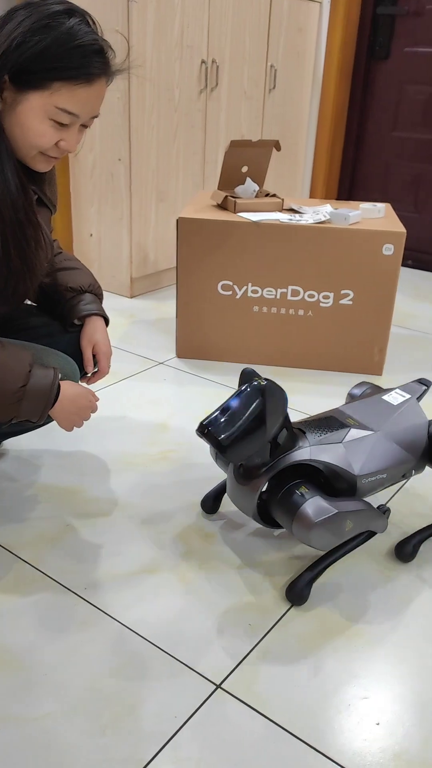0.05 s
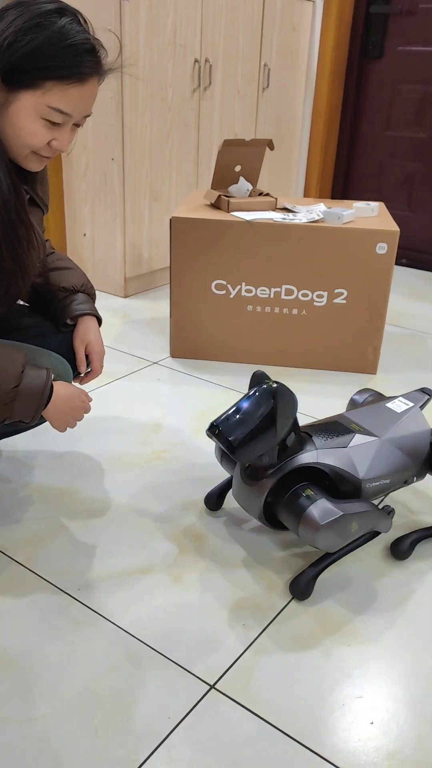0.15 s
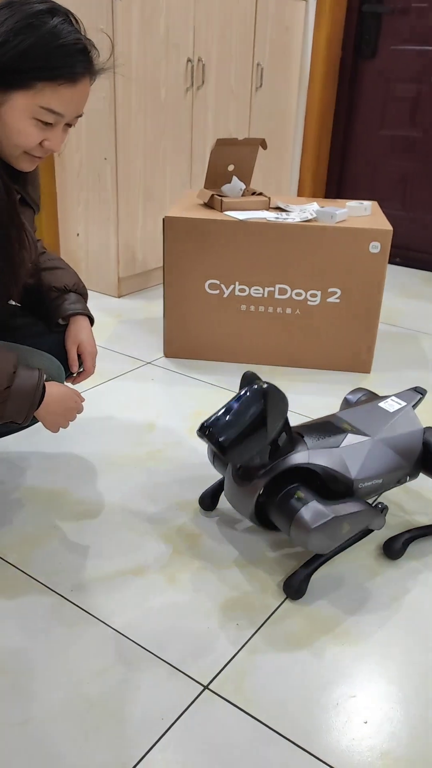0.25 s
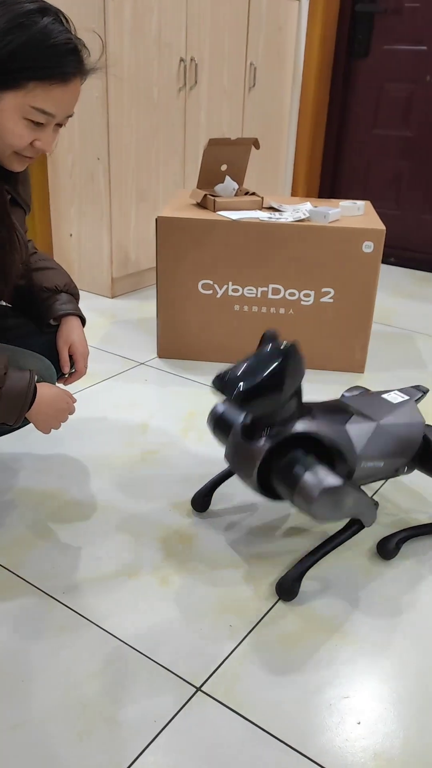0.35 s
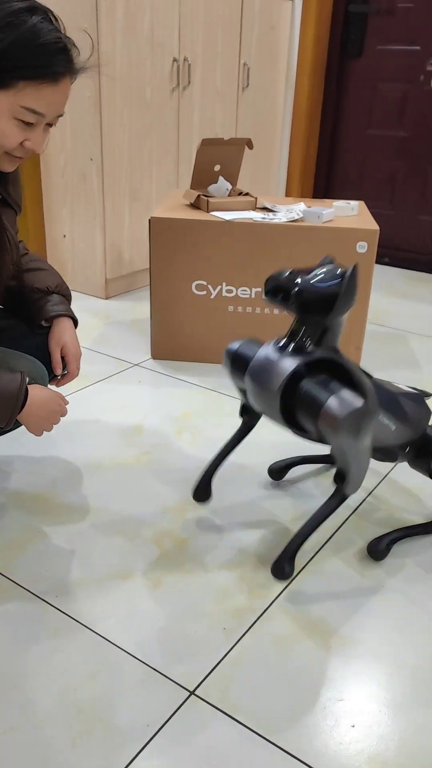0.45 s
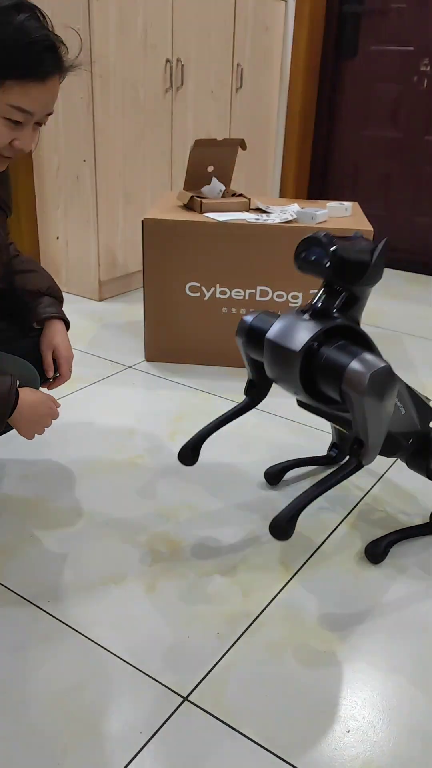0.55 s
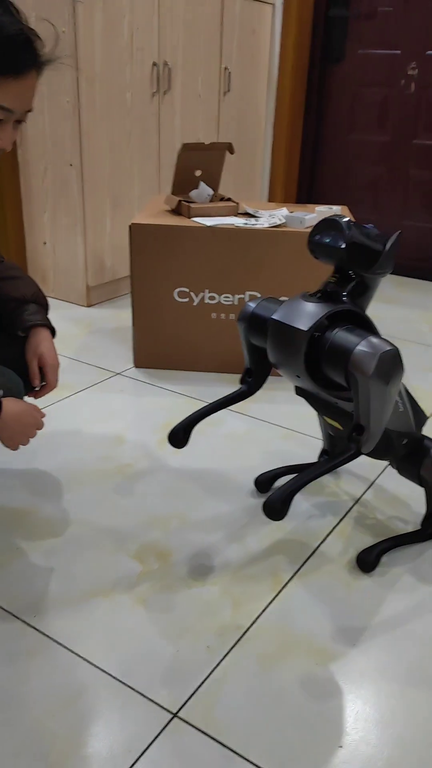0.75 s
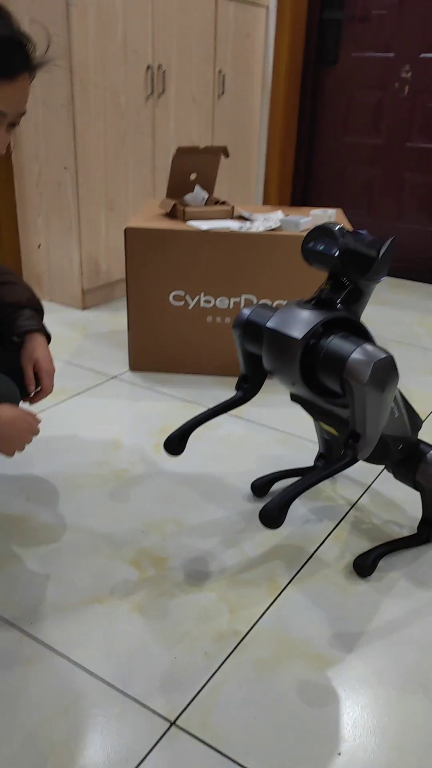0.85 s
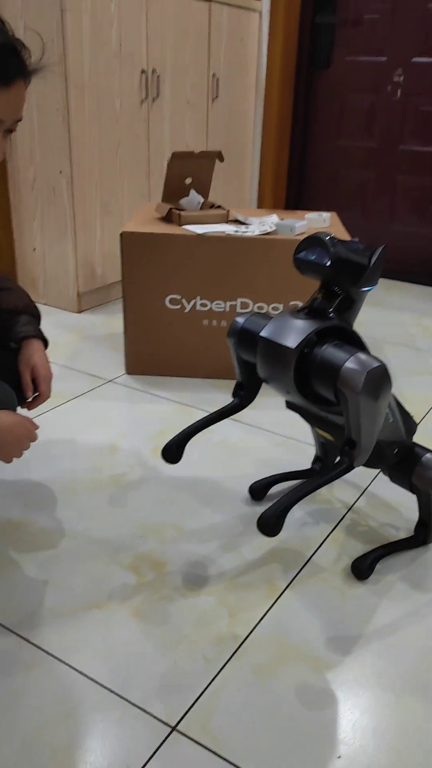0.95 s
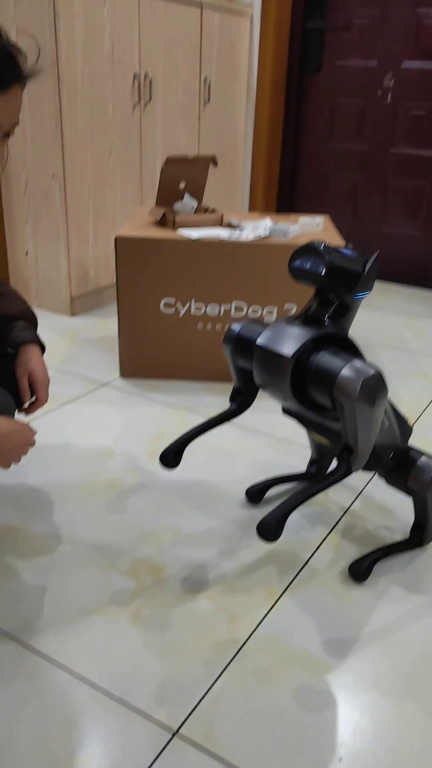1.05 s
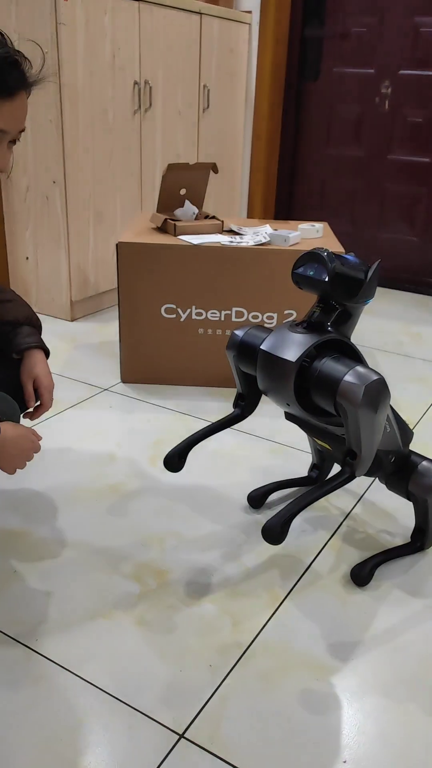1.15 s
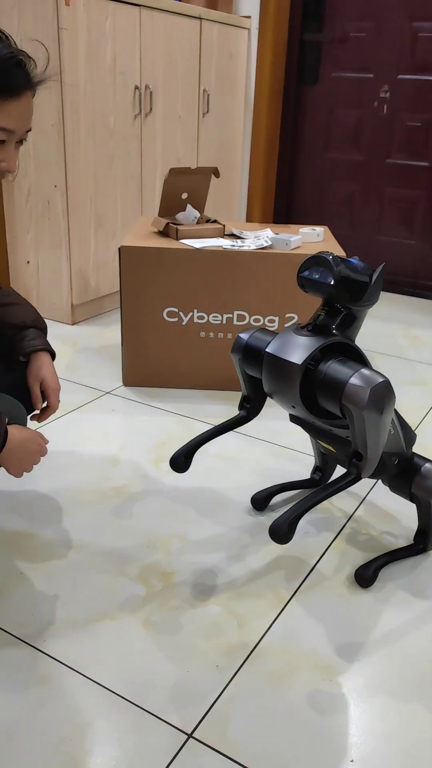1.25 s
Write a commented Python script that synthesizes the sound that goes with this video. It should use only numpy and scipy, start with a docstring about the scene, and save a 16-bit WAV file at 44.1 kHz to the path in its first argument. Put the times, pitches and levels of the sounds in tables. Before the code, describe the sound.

A four-legged robot springs up on tile. Faint fan rush and hum run throughout. At about 0.24 seconds joints and feet hit in a loud, dense burst of clacks and thuds until 0.3, with a short scuff and low boom. The hard room rings. Motors whirr upward from 0.4 to 0.57, stopping with a duller knock. Very faint foot taps come near 1.0, then a thin high whine.

```python
"""A four-legged robot springs up onto its hind legs on a tiled floor, a metre or two from the microphone.
Its joints snap taut and its feet thump (swelling sines and scattered clicks that ring the frame) and
scuff (noise grains). The motors whirr up to speed (sidebands, gear tones, rasp) and stop with a knock,
and a foot taps later. A thin switching tone comes and goes, cooling fans run on (coloured noise and
hum lines), and the small hard room rings (a tail of decaying noise bands) and booms (a low sine)."""
import sys
import numpy as np
from scipy import signal
from scipy.fft import rfft, irfft
from scipy.io import wavfile
from scipy.ndimage import uniform_filter1d

SR = 44100
rng = np.random.default_rng(int(sys.argv[2]) if len(sys.argv) > 2 else 0)


def transcribe(signal):
    """Save signal, clipped to [-1, 1], as a 16-bit WAV file at the path in sys.argv[1]."""
    frames = np.atleast_2d(signal).T
    limited = np.clip(frames, -1, 1)
    pcm = np.round(limited * 32767).astype(np.int16)
    wavfile.write(sys.argv[1], SR, pcm)


N = 57330  # samples, 1.3 s
DRIVE_HZ = 11950  # switching tone of the motor drives


def undb(db):
    """Decibels to gain."""
    return 10 ** (np.asarray(db) / 20)


def unit(x):
    """Scale to rms 1."""
    return x / np.sqrt(np.mean(x ** 2) + 1e-20)


def on_log(hz, points):
    """Read (Hz, value) points on a log-frequency axis."""
    p = np.array(points, float)
    return np.interp(np.log(np.maximum(hz, 1)), np.log(p[:, 0]), p[:, 1])


def colour(x, points, tilt_db=0, size=2048):
    """Minimum-phase filter of unit power with the given spectrum, tilted in dB per octave about 2 kHz."""
    hz = np.arange(size // 2 + 1) * SR / size
    tilt = tilt_db * np.log2(np.maximum(hz, 200) / 2000)
    gain = unit(undb(on_log(hz, points) + tilt))
    # folding the cepstrum onto positive times makes the filter causal
    cepstrum = irfft(np.log(gain))
    cepstrum[1:size // 2] *= 2
    cepstrum[size // 2 + 1:] = 0
    impulse = irfft(np.exp(rfft(cepstrum)))
    return signal.fftconvolve(x, impulse)[:len(x)]


def walk(rate):
    """Smooth random drift of rms 1, with a fresh random value `rate` times a second."""
    k = int(SR / rate)
    steps = np.repeat(rng.standard_normal(N // k + 1), k)
    smooth = uniform_filter1d(uniform_filter1d(steps, k), k)
    return unit(smooth[:N])


def since(start):
    """Seconds since a moment, 0 before it."""
    return np.maximum(np.arange(N) / SR - start, 0)


def legs():
    """Each blow is a dull thud and a hard clack; both ring the frame and shell as decaying modes."""
    # blows of legs and feet, and at 0.471 s a short creak of the gears: (time [s], thud level [dB], thud pitch
    # [Hz], # thud swell [cycles], clack level [dB], clack tilt [dB per octave], clack scatter [s])
    blows = [(0.2307, -45, 390, 0.76, -27, 0.5, 0.0057), (0.2415, -22.5, 770, 1.45, -1, 0.5, .0012),
             (0.2432, -40, 434, 0.9, 7.5, 0.7, .0018), (0.2600, -5, 403, 0.66, -5.5, 8, 0.0035),
             (0.2775, -16.5, 241, 1.17, -16.5, 4.5, .003), (0.2922, -19, 236, 0.31, -2.5, 1.5, .003),
             (0.3026, -11.5, 283, 0.58, -12, -0.5, 0.0035), (0.471, -48, 310, 0.67, -15.5, 0.5, .005),
             (0.548, -32, 294.2, 3.5, -24, -7.5, .003), (0.565, -27, 1550, 2.9, -11.5, 1, .003),
             (0.5690, -23.5, 706, 1.14, -8, -5.5, 0.0043), (0.573, -19.5, 350.6, 1.63, -9.5, -6.5, 0.0027),
             (0.5860, -26, 343, 1.3, -15.5, -3, .003), (0.59, -25, 223, 0.71, -12.5, -5, .003),
             (0.9756, -32, 1600, 0.47, -34, -2, 0.00049), (0.9778, -40.5, 332, 1.25, -47, -3, 0.0039),
             (0.9945, -34.5, 251, 0.54, -52, 4, 0.0033), (1.041, -41, 338, 1.2, -37.5, -3, 0.0053),
             (1.062, -39, 267, 0.4, -45, 3, 0.0035)]
    # modes of frame, shell and the space around them: (frequency [Hz], level [dB], t60 [s])
    body = [(148.1, -1, 0.17), (200, -2.5, 0.12), (238, -8, 0.22), (296.4, -3, 0.19), (358, -5, 0.15),
            (398.7, -6, 0.056), (470, -3.5, 0.19), (620, -18, 0.064), (752, -5, 0.047), (830, -7, 0.04),
            (1605, -1, 0.16), (2104, -38, 0.12), (2360, -5, 0.033), (2365, -14, 0.08), (3140, -38, 0.18)]
    # spectrum of a clack before its tilt: (frequency [Hz], relative level [dB])
    clack_spectrum = [(200, -12.5), (600, -5), (1150, -7.5), (1600, -1), (2050, -6), (2600, -0.5),
                      (3400, -8.5), (5500, -12), (8000, -27.5), (11500, -35.5), (16000, -37.5)]
    ring_db = 7
    push = np.zeros(N)
    for start, thud_db, hz, swell_cycles, clack_db, tilt_db, length in blows:
        cycles = since(start) * hz
        swell = cycles / swell_cycles
        envelope = swell * np.exp(1 - swell)  # peaks at 1 after swell_cycles
        push += .5 * undb(thud_db) * envelope * np.sin(2 * np.pi * cycles)
        push += undb(clack_db) * colour(clack(start, length), clack_spectrum, tilt_db)
    ring = np.zeros(N)
    for hz, db, t60 in body:
        r = np.exp(-np.log(1000) / (t60 * SR))  # decay per sample
        mode = signal.lfilter([1], [1, -r * np.exp(2j * np.pi * hz / SR)], push).real
        ring += undb(db) * 2 * (1 - r) * mode
    return push + undb(ring_db) * ring


def clack(start, length):
    """A click whose frequencies arrive scattered, on average `length` seconds after the start."""
    delay = start + length * walk(400)[:N // 2 + 1] ** 2  # the drift runs along frequency here
    phase = 2 * np.pi * np.cumsum(delay) * SR / N
    return irfft(np.exp(-1j * phase), N)


def scuff(spread_db=5):
    """Rubber feet skid on the tile in dense stick-slip grains as they shove off."""
    # spectrum of the skid: (frequency [Hz], relative level [dB])
    skid_spectrum = [(200, -11), (600, 17.5), (1200, 1), (2500, 4.5), (3500, -12), (6000, -2.5),
                     (8200, -17.5), (11000, -7), (16000, -27)]
    start_s, rise_s, hold_s, fade_s = 0.248, 0.0074, 0.004, 0.029
    level_db, grains_per_s = -25.5, 1100
    age = since(start_s)
    hits = rng.random(N) < grains_per_s / SR
    grains = hits * rng.standard_normal(N) * undb(spread_db * rng.standard_normal(N))
    rise = np.minimum(age / rise_s, 1)
    fade = np.exp(-np.maximum(age - rise_s - hold_s, 0) / fade_s)
    return undb(level_db) * colour(unit(grains) * rise * fade, skid_spectrum)


def motors(wobble=0.0396, flutter_db=3):
    """Sidebands fan out from the switching tone as the motors speed up, and the gears sing and rasp."""
    # motor speed before each motor's share: (time [s], electrical frequency [Hz])
    speed = [(0, 4.6), (.3, 4), (.38, 35), (.42, 95), (.46, 270), (.50, 440), (.53, 490), (.553, 560),
             (.568, 110), (.59, 3.66), (1.3, 4.6)]
    # motors turning together: (share of the speed [ratio], level [dB])
    motor_shares = [(1.0, -2.5), (.87, -3.5), (0.67, -18), (0.13, -2)]
    # sidebands of the switching tone: (multiple of the motor's speed [ratio], level [dB])
    sidebands = [(1, -6.5), (2, 0), (3, -11)]
    # gear tones: (multiple of the motor's speed [ratio], level [dB])
    gear_tones = [(2.9, -11), (4.0, -14), (5.3, -1.5), (6.9, -9.5)]
    # spectrum of the gear rasp: (frequency [Hz], relative level [dB])
    rasp_spectrum = [(200, 3), (400, 1), (850, -37), (1150, -9), (1500, 4.5), (2100, -19.5), (2900, -10),
                     (3400, -1.5), (5500, -14.5), (8000, -24.5), (16000, -36)]
    # what the motor housings pass: (frequency [Hz], relative level [dB])
    casing = [(9000, -15), (11200, 2.5), (12300, -4), (13200, 1), (14500, -11.5)]
    full_hz = 560
    whine_db, mesh_db, rasp_db = -47.5, -34, -37  # relative; the whine is halved at the end
    whine_law, gear_law = 1, 3  # level grows as speed to this power
    t = np.arange(N) / SR
    hz = np.maximum(np.interp(t, *np.array(speed).T), 1)
    effort = hz / full_hz
    whine, mesh = np.zeros(N), np.zeros(N)
    for share, motor_db in motor_shares:
        turn = 2 * np.pi * np.cumsum(hz * share * (1 + wobble * walk(200))) / SR
        for k, db in sidebands:
            gain = undb(motor_db + db + flutter_db * walk(149.3))
            whine += gain * np.cos(k * turn + 2 * np.pi * rng.random())
        for k, db in gear_tones:
            gain = share ** 2 * undb(motor_db + db + flutter_db * walk(123.2))
            mesh += gain * np.sin(k * turn)
    # multiplying by the switching tone puts a sideband on each side of it
    whine *= undb(whine_db) * effort ** whine_law * np.sin(2 * np.pi * DRIVE_HZ * t)
    rasp = colour(rng.standard_normal(N), rasp_spectrum)
    gears = (undb(mesh_db) * mesh + undb(rasp_db) * rasp) * effort ** gear_law
    return .5 * colour(whine, casing) + gears


def gearbox():
    """Gear teeth chatter, as noise, in a resonance of their housing while the legs swing."""
    # level of the chatter, silent outside these times: (time [s], level [dB])
    chatter_level = [(.40, -54), (.465, -48.5), (0.48, -37.5), (0.488, -61), (.505, -43), (0.552, -40),
                     (.58, -70)]
    resonance_hz, resonance_q = 2033, 4.7
    b, a = signal.iirpeak(resonance_hz, resonance_q, SR)
    once = signal.lfilter(b, a, rng.standard_normal(N))
    chatter = unit(signal.lfilter(b, a, once))
    t = np.arange(N) / SR
    return chatter * undb(np.interp(t, *np.array(chatter_level).T, left=-np.inf, right=-np.inf))


def holding(waver_db=3.0):
    """The thin switching tone of motors that hold still under load, a sine of wavering level."""
    # level of the tone while holding a pose, before its waver: (time [s], level [dB])
    hold_level = [(0, -75.5), (.15, -88), (1.04, -110), (1.12, -74.5), (1.3, -87)]
    t = np.arange(N) / SR
    level_db = np.interp(t, *np.array(hold_level).T) + waver_db * walk(31.7)
    return undb(level_db) * np.sin(2 * np.pi * DRIVE_HZ * t)


def fans(waver_db=0.54, drift=0.0051):
    """Steady rush of the cooling fans, noise from all sides, with a few wavering hum lines."""
    # spectrum of the rush: (frequency [Hz], relative level [dB])
    rush_spectrum = [(25, -9), (55, 1.5), (90, -2.5), (120, 2), (170, -7.5), (280, -2.5), (370, -6.5),
                     (540, -11.5), (680, -11), (810, -9.5), (950, -16), (1600, -16), (2450, -15),
                     (3500, -21), (5700, -27), (7000, -42.5), (9000, -45), (11500, -36.5), (16000, -55)]
    # hum lines: (frequency [Hz], level [dB])
    hum_lines = [(58, -68), (122, -69.5), (366, -64), (798, -69)]
    rush_db = -55.5
    hz, noise = diffuse()
    rush = unit(irfft(noise * undb(on_log(hz, rush_spectrum)), N))
    out = undb(rush_db + waver_db * walk(5.2)) * rush
    for f, db in hum_lines:
        gain = undb(db + 2 * walk(10.2))
        turn = 2 * np.pi * np.cumsum(f * (1 + drift * walk(16))) / SR
        out += gain * np.sin(turn)
    return out


def boom():
    """The lowest mode of the room builds slowly and hangs on, a sine with a long decay."""
    # swells of the mode: (time [s], level [dB])
    swells = [(0.263, -26.5), (0.689, -49)]
    mode_hz, t60_s, rise_s = 58.9, 0.98, 0.034
    out = np.zeros(N)
    for start, db in swells:
        age = since(start)
        envelope = (1 - np.exp(-age / rise_s)) * np.exp(-np.log(1000) * age / t60_s)
        out += undb(db) * envelope * np.sin(2 * np.pi * mode_hz * age)
    return out


def diffuse():
    """Spectra of noise from all sides: alike in both channels in the bass, unrelated in the treble."""
    wide_hz = 584  # the channels part around here
    hz = np.arange(N // 2 + 1) * SR / N
    mid, side = np.exp(2j * np.pi * rng.random((2, len(hz))))
    alike = .98 / (1 + (hz / wide_hz) ** 3)
    left_right = np.array([[1], [-1]])
    return hz, np.sqrt(N / 2) * (mid * np.sqrt(1 + alike) + side * np.sqrt(1 - alike) * left_right)


def room(x):
    """Direct sound a little from the left, then a diffuse tail of noise bands, each with its own decay."""
    # reverberation time of the room: (frequency [Hz], t60 [s])
    room_t60 = [(100, 0.56), (300, 0.36), (1000, 0.35), (2500, 0.33), (6000, 0.38), (12000, 0.11)]
    tail_db, build_s, bass_db = 3.5, 0.0023, -9.5  # bass_db is added well below 600 Hz
    pan_db, lag_s = 2.5, .00015  # the right channel is weaker and later
    t = np.arange(N) / SR
    hz, noise = diffuse()
    centres = 62.5 * 2. ** np.arange(9)  # octave bands, Hz
    tail = np.zeros((2, N))
    for centre, pick in zip(centres, np.eye(len(centres))):
        band = irfft(noise * on_log(hz, list(zip(centres, pick))), N)
        t60 = on_log(centre, room_t60)
        fade = np.exp(-np.log(1000) * t / t60) * (1 - np.exp(-t / build_s))
        level = undb(tail_db + bass_db / (1 + (centre / 600) ** 2))
        tail += band * fade / np.sqrt(np.sum(fade ** 2)) * level
    left = x * undb(pan_db / 2)
    right = np.roll(x, int(lag_s * SR)) * undb(-pan_db / 2)
    return np.array([left, right]) + signal.fftconvolve(x[None], tail, axes=1)[:, :N]


def scene():
    """The robot in its room, over the boom, the fans and the switching tone."""
    robot = legs() + scuff() + motors() + gearbox()
    return room(robot) + boom() + fans() + holding()


def record(dry):
    """The recorder cuts the deepest bass and the top."""
    low_hz, top_hz = 32.7, 15750
    lean = signal.sosfilt(signal.butter(2, low_hz, "high", fs=SR, output="sos"), dry)
    return signal.sosfilt(signal.ellip(10, .2, 80, top_hz, fs=SR, output="sos"), lean)


dry = scene()
out = record(dry)
transcribe(out)
```